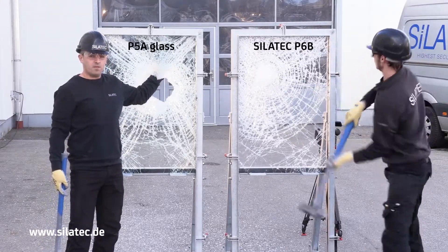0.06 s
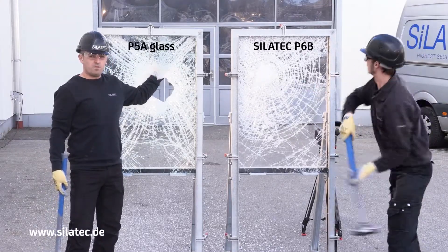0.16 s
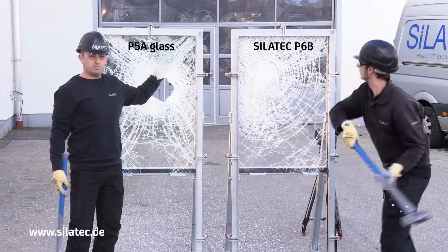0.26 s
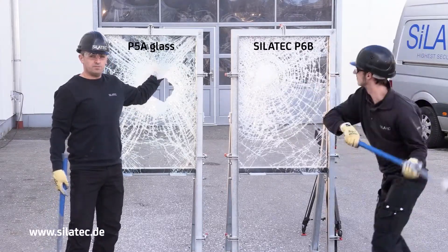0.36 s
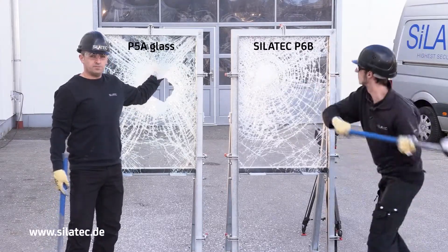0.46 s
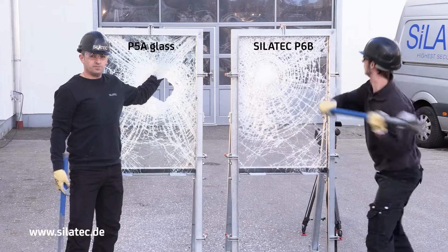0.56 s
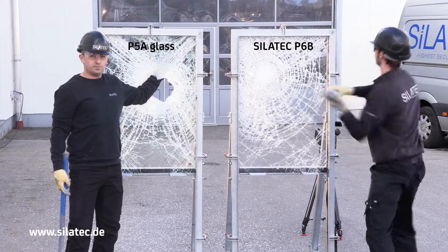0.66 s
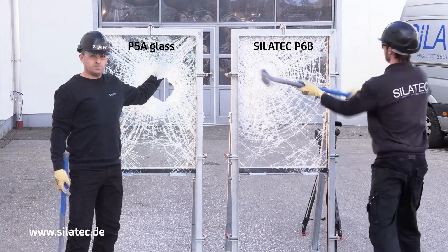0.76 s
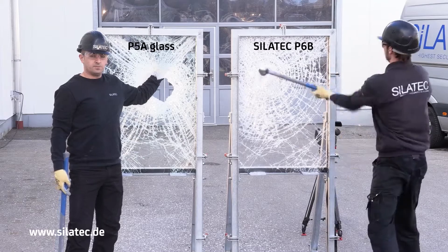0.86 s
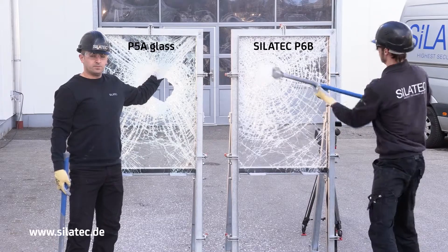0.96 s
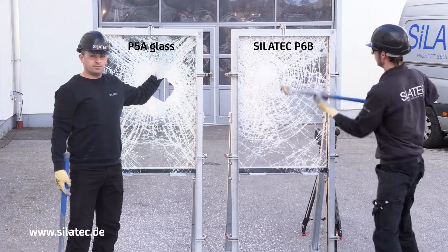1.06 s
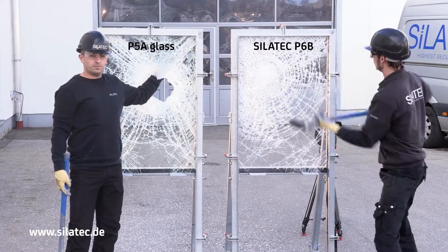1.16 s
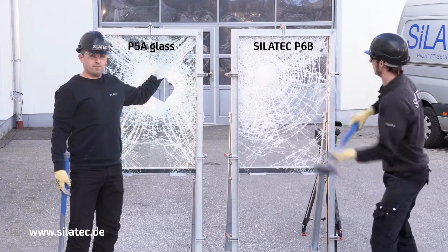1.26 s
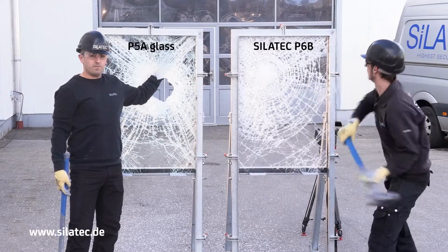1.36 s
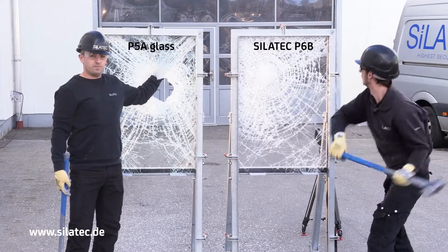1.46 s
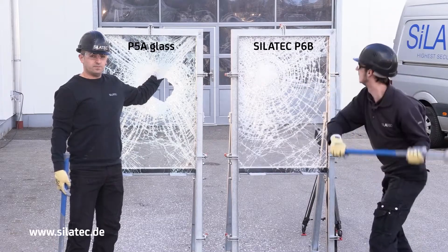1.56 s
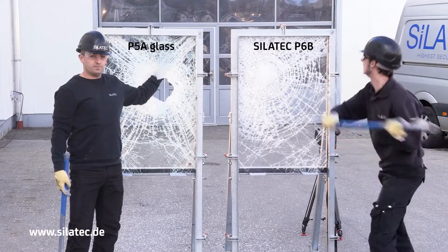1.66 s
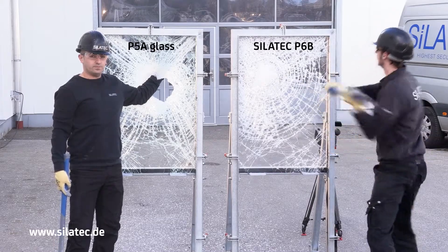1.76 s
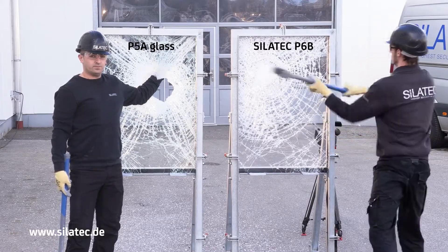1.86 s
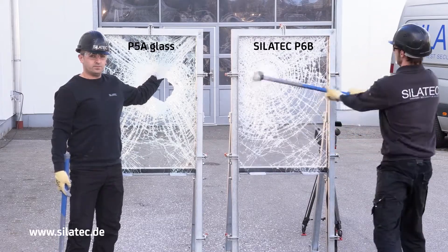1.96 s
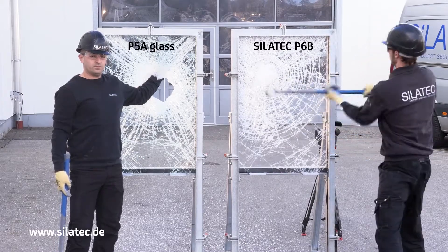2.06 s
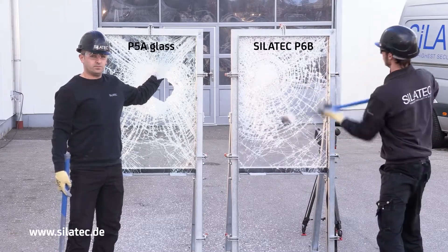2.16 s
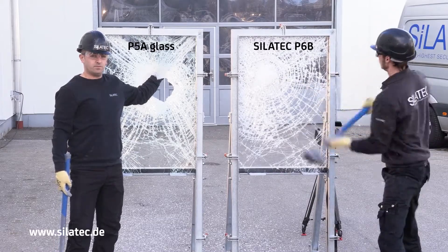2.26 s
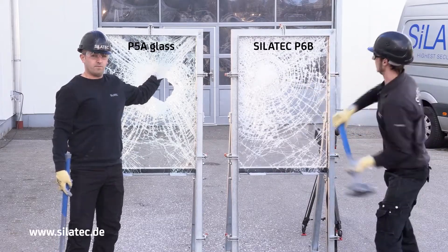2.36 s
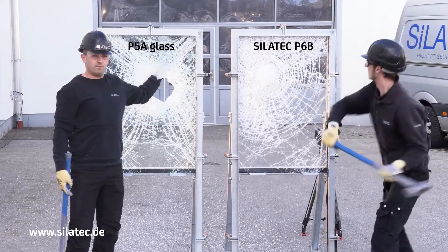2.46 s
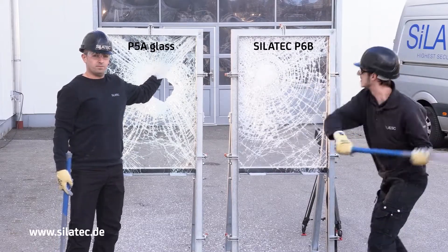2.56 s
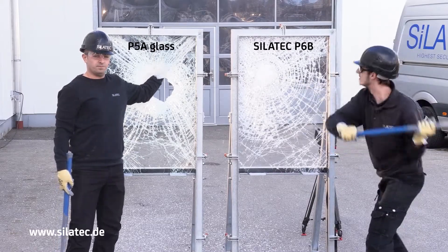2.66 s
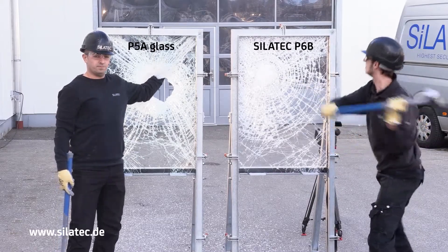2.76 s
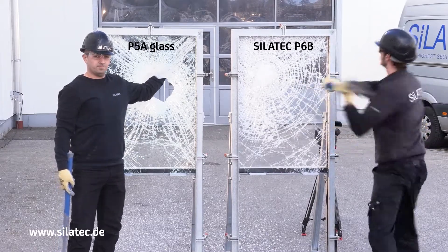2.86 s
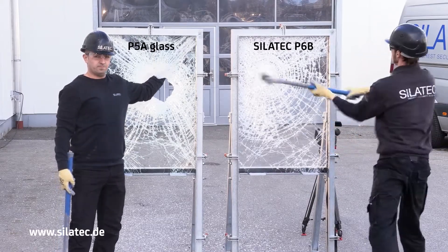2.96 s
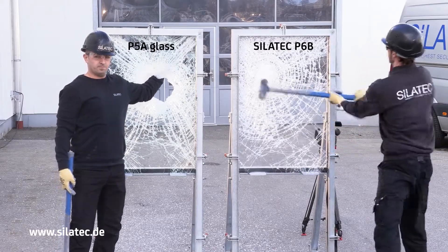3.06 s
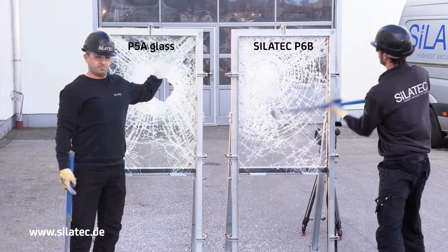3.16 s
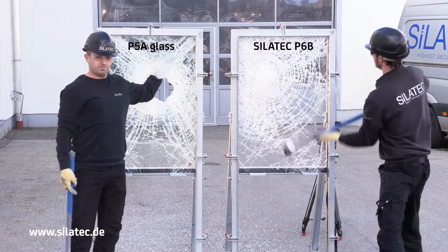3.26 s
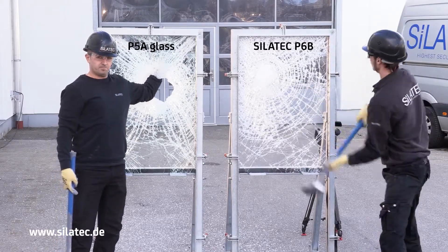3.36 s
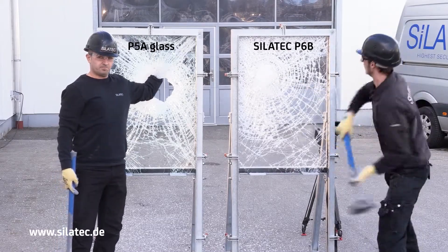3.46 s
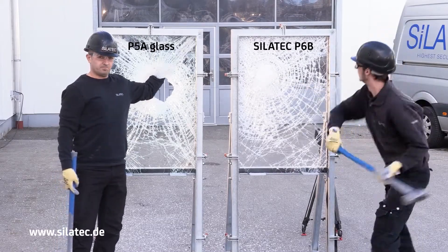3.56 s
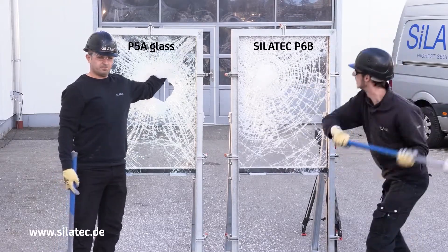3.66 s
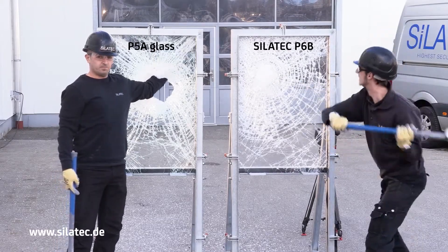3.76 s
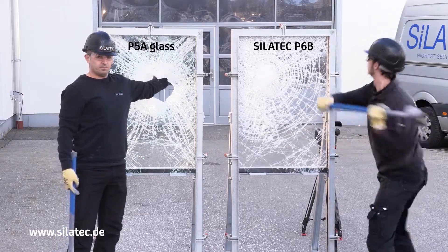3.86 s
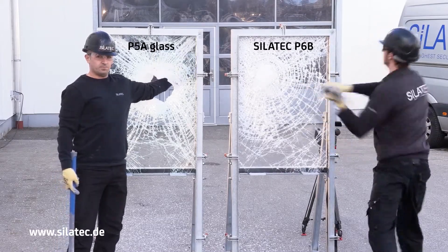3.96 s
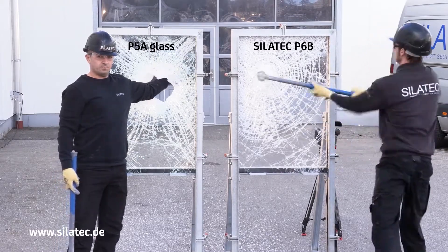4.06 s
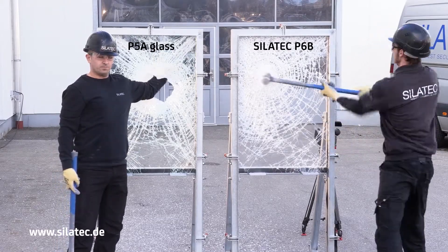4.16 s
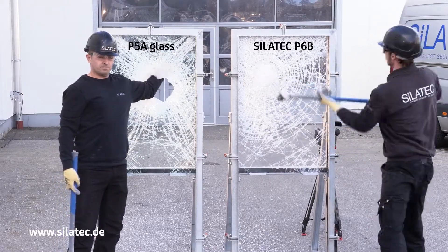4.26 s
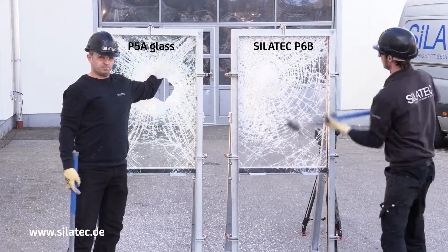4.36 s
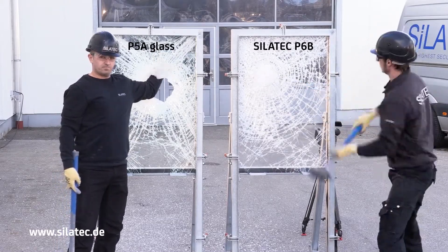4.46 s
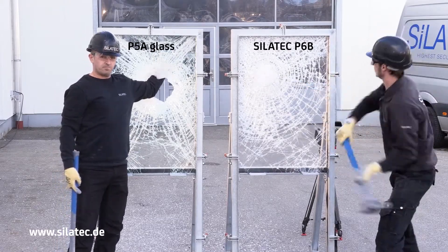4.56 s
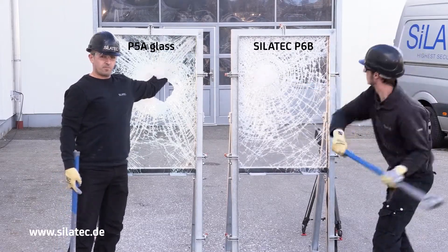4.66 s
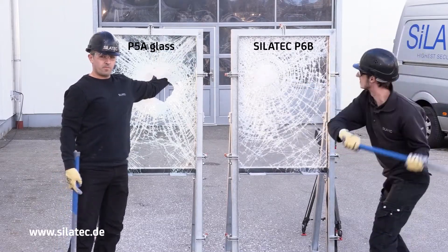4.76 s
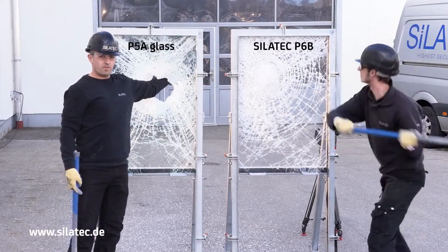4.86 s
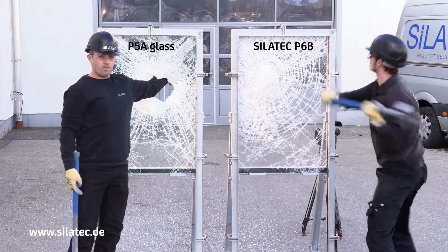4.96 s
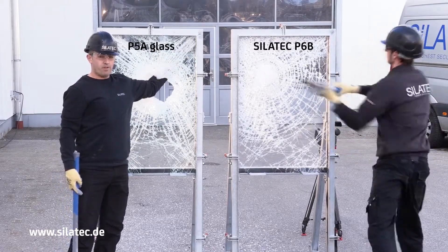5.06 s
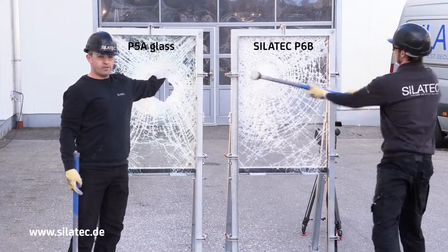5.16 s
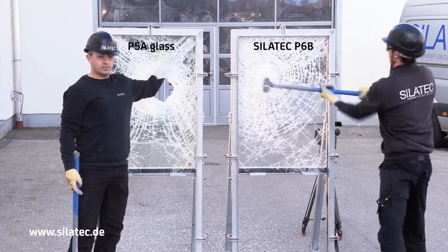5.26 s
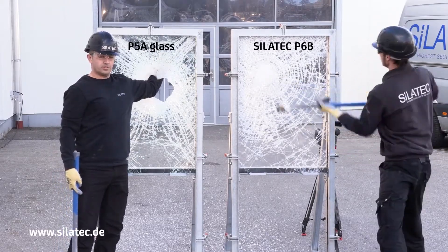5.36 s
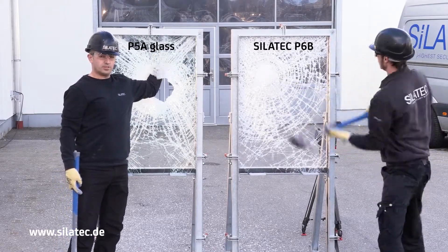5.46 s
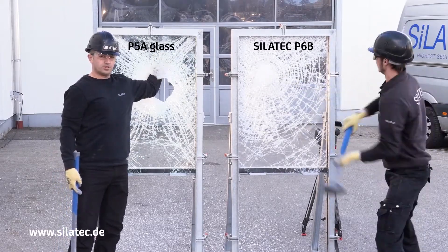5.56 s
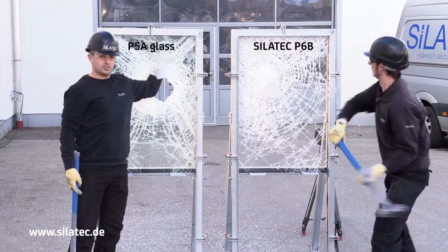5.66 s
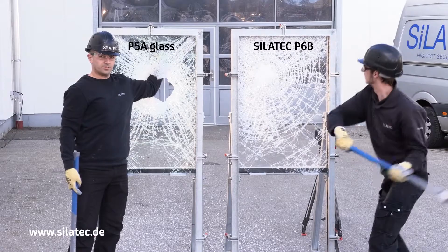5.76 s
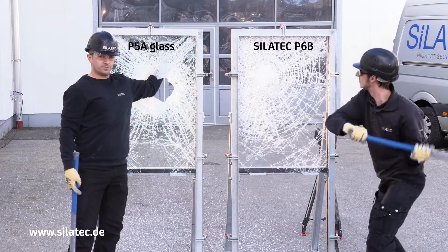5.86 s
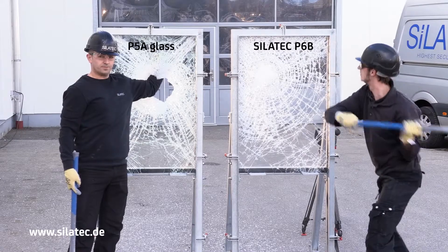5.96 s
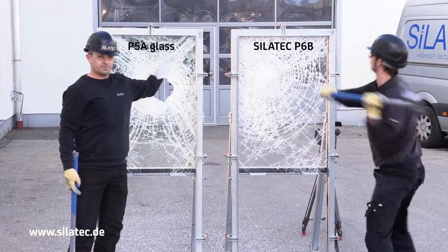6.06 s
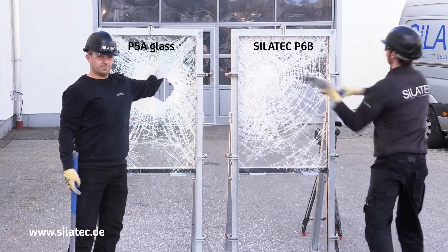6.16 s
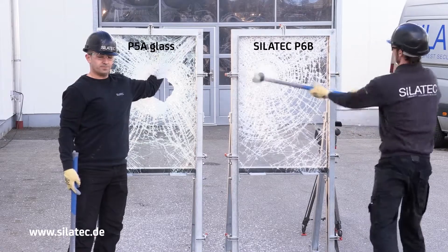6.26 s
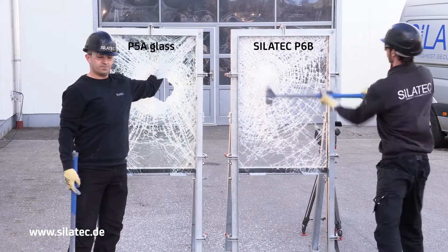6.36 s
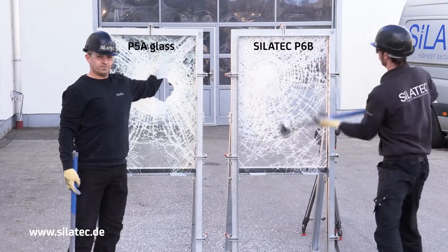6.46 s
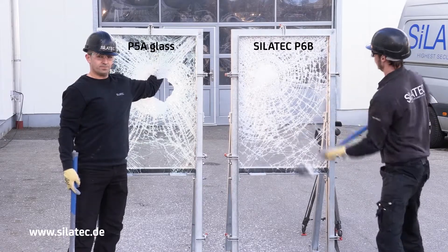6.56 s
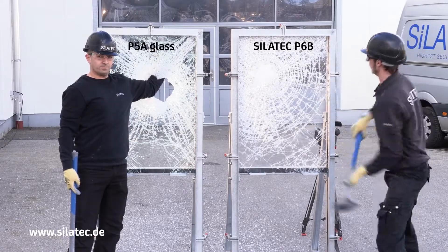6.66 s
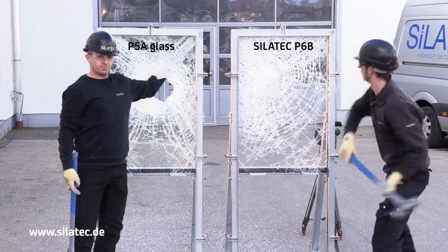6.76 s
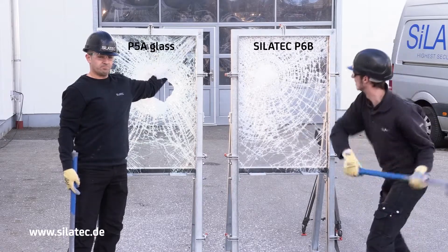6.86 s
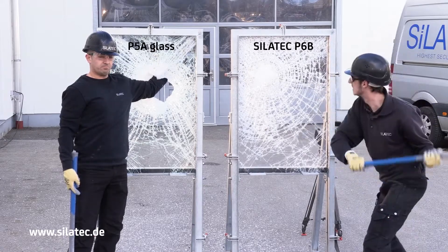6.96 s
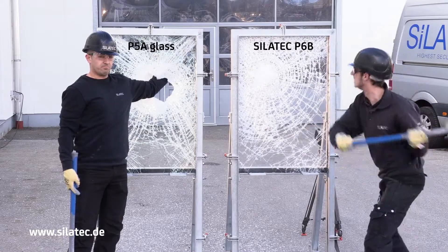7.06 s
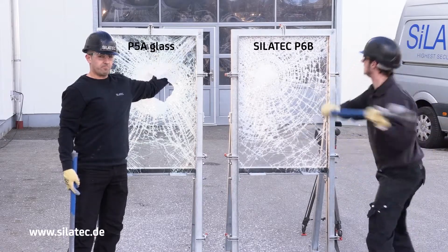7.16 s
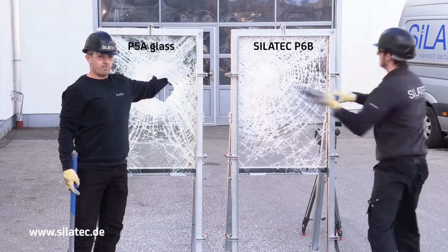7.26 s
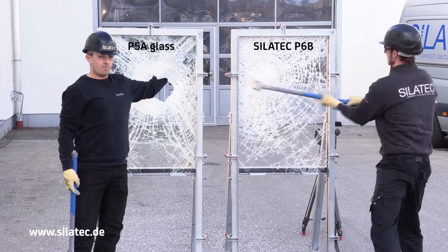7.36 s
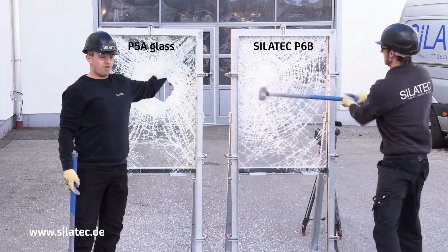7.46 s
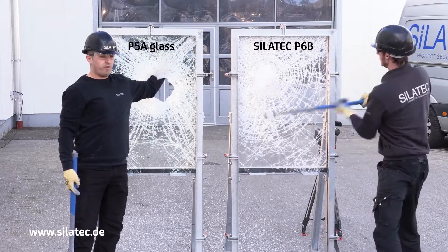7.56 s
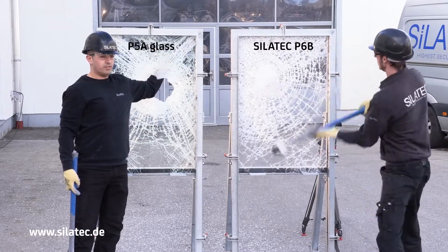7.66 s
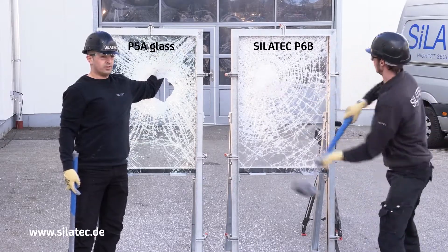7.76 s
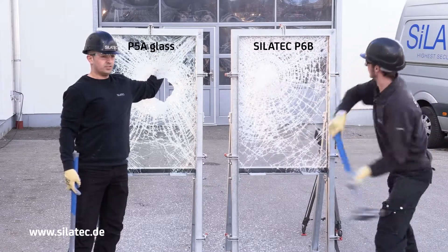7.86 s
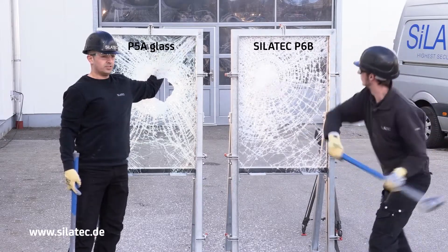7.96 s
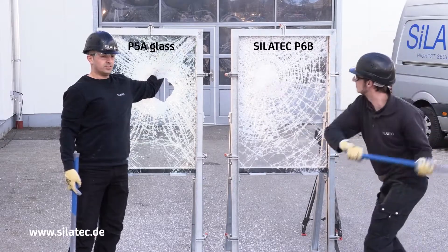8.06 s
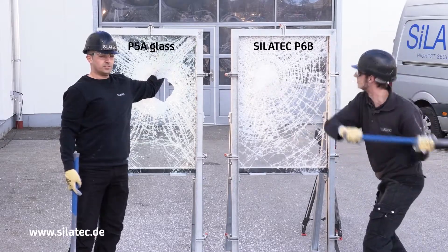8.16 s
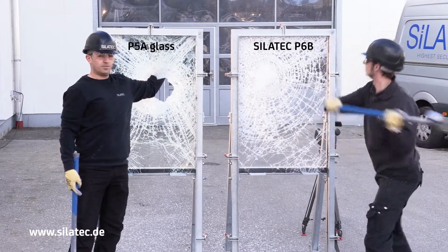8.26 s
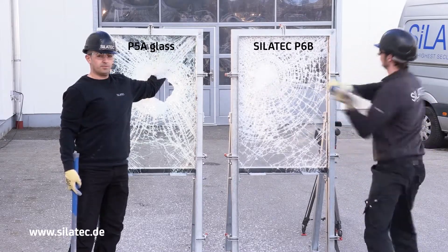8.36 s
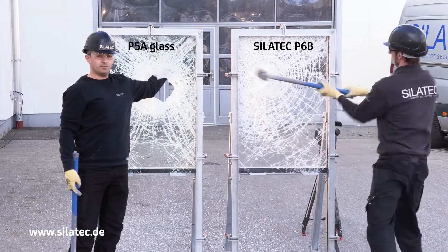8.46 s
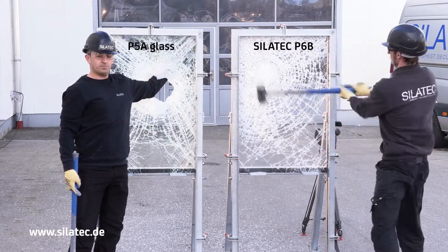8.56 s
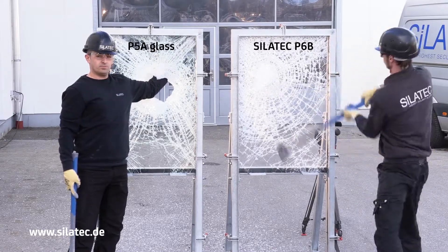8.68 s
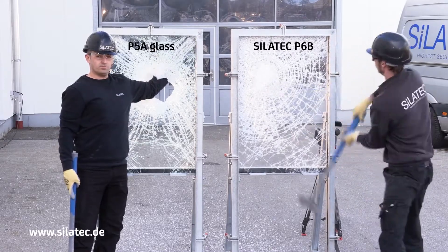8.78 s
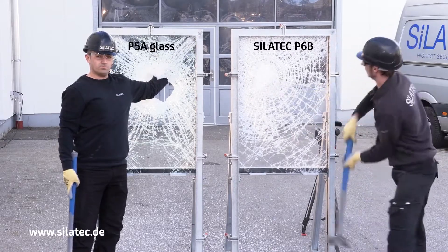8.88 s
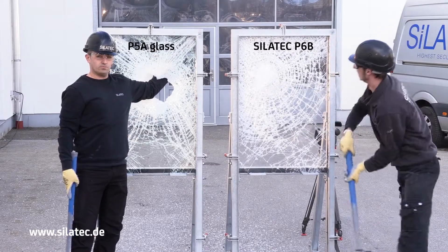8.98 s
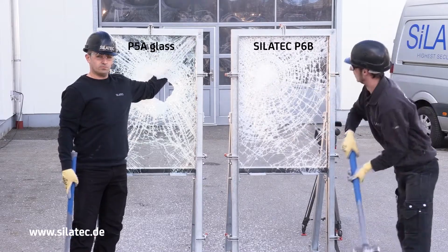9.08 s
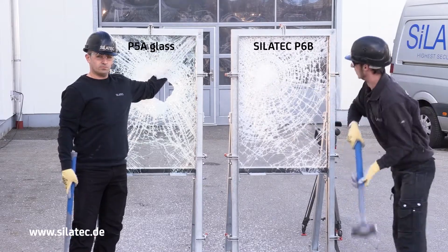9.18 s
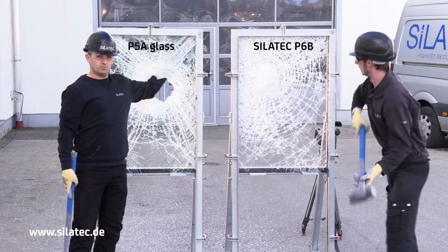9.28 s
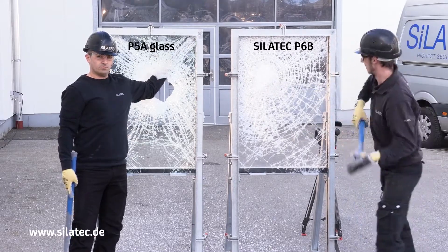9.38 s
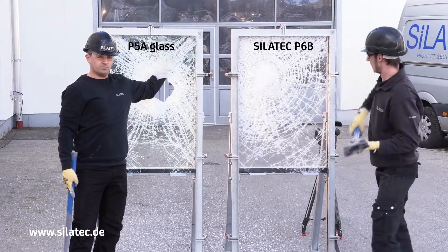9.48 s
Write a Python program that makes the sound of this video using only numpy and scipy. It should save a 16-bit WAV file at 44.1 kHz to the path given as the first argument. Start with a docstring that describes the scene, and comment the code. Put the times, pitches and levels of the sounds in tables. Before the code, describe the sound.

A sledgehammer pounds a cracked laminated glass pane in a paved yard, heard from nearby over faint outdoor air. The sound opens on the dying tail of a blow. Eight more follow at nearly equal strength, at about 0.9, 2.0, 3.1, 4.1, 5.2, 6.3, 7.4 and 8.6 seconds. Each is a hard knock with a low thump, a short ring and a crunch of cracking glass, echoed briefly by the walls. Loose shards chatter after each hit, and about half a second later fine grit patters and tinkles onto the paving. Larger splinters clink at around 0.4, 2.6, 3.6, 4.8, 5.7 and 6.8 seconds, much quieter than the blows. A faint sole scuff and clothing swish lead into each strike. From about 8 seconds boots scrape and tread softly, with a last dull step near 9.5 seconds.

```python
"""A paved workshop yard: about once a second a sledgehammer hits cracked laminated glass in a steel stand.
Each blow is a hard knock, a thump of the bulging pane and a crunch of cracks, thrown back by the walls.
Loose shards chatter, and half a second later grit and splinters land on the paving.
Clothes swish before each swing and boots shuffle, over a faint outdoor background."""
import sys
import numpy as np
from scipy import signal
from scipy.fft import rfft, irfft, next_fast_len
from scipy.io import wavfile

SR = 44100
rng = np.random.default_rng(int(sys.argv[2]) if len(sys.argv) > 2 else 0)


def master(y):
    """Save y as 16-bit WAV."""
    cut = np.clip(np.atleast_2d(y).T, -1, 1)
    pcm = np.round(cut * 32767)  # scale
    wavfile.write(sys.argv[1], SR, pcm.astype(np.int16))


N = 419816
LEAD_S = .3   # the work is already under way at 0 s
TIME = np.arange(-round(LEAD_S * SR), N) / SR
AGE = np.arange(int(.8 * SR)) / SR   # clock of one event
CUTOFF_HZ = 15700


def from_db(db):
    """Decibels to gain."""
    return 10 ** (np.asarray(db) / 20)


def unit_rms(x):
    """Scale to rms 1."""
    return x / np.sqrt(np.mean(x ** 2) + 1e-20)


def at_hz(table, hz):
    """Read a table on a log-frequency axis."""
    table_hz, values = np.array(table).T
    return np.interp(np.log(hz + 1e-3), np.log(table_hz), values)


def fade(t60_s, age=AGE):
    """Exponential decay, 60 dB in t60_s."""
    return np.exp(-np.log(1000) * age / t60_s)


def add(track, start_s, sound):
    """Mix a sound into a track."""
    at = int(round(start_s * SR))
    first, last = max(at, 0), min(at + sound.shape[-1], track.shape[-1])
    if last > first:
        track[..., first:last] += sound[..., first - at:last - at]


def butter(x, hz, kind, order=2):
    """Causal Butterworth filter."""
    sos = signal.butter(order, np.minimum(hz, SR / 2 - 500), kind, fs=SR, output="sos")
    return signal.sosfilt(sos, x + 1e-18)


def colour(x, spectrum, size=4096):
    """Minimum-phase filter of the given spectral shape; white noise keeps its power."""
    gain = unit_rms(from_db(at_hz(spectrum, np.fft.rfftfreq(size, 1 / SR))))
    cepstrum = irfft(np.log(gain))
    cepstrum[1:size // 2] *= 2
    cepstrum[size // 2 + 1:] = 0
    response = irfft(np.exp(rfft(cepstrum)))[:size // 2]
    filtered = signal.oaconvolve(np.atleast_2d(x), response[None], axes=1)
    return filtered[:, :x.shape[-1]].reshape(x.shape)


def grains(length, per_s, spread_db):
    """Two trains of random clicks of uneven size, on the same moments; rms 1."""
    born = rng.random(length) < per_s / SR
    sizes = from_db(spread_db * np.minimum(rng.exponential(1, length), 4))
    return unit_rms(born * sizes * rng.standard_normal((2, length)))


# stereo width: (frequency [Hz], side minus mid [dB])
STEREO_WIDTH = [(60, -22), (200, -33.5), (400, -22), (700, -16), (1300, -10), (2400, -2), (4400, -4.5),
                (8000, -5.5), (15000, -13.5)]
# stereo lean: (frequency [Hz], left minus right [dB])
STEREO_LEAN = [(150, -.5), (700, 0), (2000, 0.2), (4200, 5.1), (7500, 1), (12000, -1)]


def stereo(pair, widen_db):
    """Two unrelated signals to left and right: alike in the bass, wide and lopsided in the treble."""
    length = pair.shape[-1]
    size = next_fast_len(length, True)
    hz = np.fft.rfftfreq(size, 1 / SR)
    ratio = from_db(at_hz(STEREO_LEAN, hz))
    lean = rfft(pair[0], size) * (ratio - 1) / (ratio + 1)
    spread = rfft(pair[1], size) * from_db(at_hz(STEREO_WIDTH, hz) + widen_db)
    side = irfft(spread + lean, size)[:length]
    return np.array([pair[0] + side, pair[0] - side])


# outdoor background: (frequency [Hz], relative density [dB])
AIR_SPECTRUM = [(15, -51), (25, -1.5), (101, 1.5), (183, 3.5), (297, -1.5), (399, 0), (445, -7.5),
                (1080, -9), (2010, -17), (2420, -19), (4380, -21.5), (6050, -18), (8130, -34.5),
                (11800, -36), (15500, -61.5)]


def air(db=-62.5):
    """Steady, low outdoor noise."""
    noise = rng.standard_normal((2, len(TIME)))
    return from_db(db) * stereo(colour(noise, AIR_SPECTRUM), widen_db=2)


def contact(full_stretch_s=.0121, snap_db=1.5):
    """Steel meets glass in one sharp pulse; at full stretch the pane snaps in a quick run of cracks."""
    pulses = 1.8 * butter((AGE == 0) * 1., 1800, "low", order=1)
    cracks = [round((full_stretch_s + gap_s) * SR) for gap_s in (0, .0002, .0005)]
    pulses[cracks] += from_db(snap_db) * np.array([1.15, -.7, .45])
    return pulses


def thump(hz=164.8, peak_s=.008, bulge_db=-13, sway_hz=133, sway_db=-33, sway_t60_s=.35):
    """The pane bulges and its soft interlayer stops it in a few swings; the stand sways on."""
    envelope = (AGE / peak_s * np.exp(1 - AGE / peak_s)) ** 4
    pitch_hz = hz * rng.normal(1, .025)
    bulge = envelope * np.cos(2 * np.pi * pitch_hz * (AGE - peak_s))
    sway = np.cos(2 * np.pi * sway_hz * (AGE - peak_s)) * fade(sway_t60_s) * np.minimum(AGE / peak_s, 1)
    return -from_db(bulge_db) * bulge - from_db(sway_db) * sway


# modes of pane and stand: (frequency [Hz], relative level [dB], t60 [s])
PANE_MODES = [(308.3, -27.5, 0.22), (370.8, -28.5, 0.12), (410.2, -34.5, 0.18), (558, -28.5, 0.17),
              (703, -37.5, 0.14), (795.6, -33.5, 0.14), (842, -39.5, 0.28), (883, -34.5, 0.13),
              (1449, -35.5, 0.29), (1630, -46, 0.42), (1950, -33, 0.22), (2030, -35.5, 0.38),
              (2290, -43.5, 0.17), (2760, -39.5, 0.48), (2860, -41, 0.51), (2825, -44.5, 0.51),
              (3800, -35.5, 0.37), (4043, -35, 0.2), (4830, -37, 0.27)]


def knock(scatter_db=2, scatter_hz=14, sharp_hz=40, sag_s=.025, build_s=.002):
    """The modes ring with new strengths at each blow: sharp while the pane is stretched, then sagging."""
    hz, mode_db, t60_s = np.array(PANE_MODES).T[:, :, None]
    detune, start_cycles, strength = rng.standard_normal((3, len(hz), 1))
    pitch_hz = hz + scatter_hz * detune + sharp_hz * np.exp(-AGE / sag_s)
    phase = 2 * np.pi * (np.cumsum(pitch_hz, axis=1) / SR + start_cycles)
    envelope = from_db(mode_db + scatter_db * strength) * fade(t60_s)
    side_sign = rng.choice([-1, 1], (len(hz), 1))
    mid = (envelope * np.sin(phase)).sum(0)
    side = (envelope * side_sign * np.cos(phase)).sum(0)
    return np.array([mid, side]) * (1 - np.exp(-AGE / build_s))


def buckle(gain_db=-22, band_hz=(480, 930), t60_s=.13):
    """Broken plates of glass buckle against each other in a brief, woody rattle."""
    clicks = grains(len(AGE), per_s=1500, spread_db=2)
    rattle = unit_rms(butter(clicks, band_hz, "band", order=3))
    return from_db(gain_db) * rattle * fade(t60_s)


def crunch(gain_db=-22, t60_s=.31, grind_db=-17, grind_t60_s=.65):
    """Cracks race through the glass, then the broken edges grind as the pane springs back."""
    racing = grains(len(AGE), per_s=7000, spread_db=1.5) * fade(t60_s)
    grinding = grains(len(AGE), per_s=500, spread_db=3) * fade(grind_t60_s)
    return from_db(gain_db) * (racing + from_db(grind_db) * grinding)


def chatter(db=-44, first_s=.15, last_s=.48, burst_t60_s=.082, t60_s=.85, band_hz=(3200, 6600), count=3):
    """Loose shards held in the swaying pane chatter in short bursts, the later ones weaker."""
    bursts = np.zeros((2, len(AGE)))
    for late_s in rng.uniform(first_s, last_s, count):
        burst = grains(len(AGE), per_s=3000, spread_db=2) * fade(burst_t60_s)
        add(bursts, late_s, from_db(db) * fade(t60_s, late_s - first_s) * burst)
    return butter(bursts, band_hz, "band")


# crunching glass, contact snap, small fragments: (frequency [Hz], relative density [dB])
CRUNCH_SPECTRUM = [(100, -25), (300, 7), (600, 4.5), (900, 3), (1150, 2), (2100, 3), (2450, -3),
                   (2900, 2.5), (4200, -4), (6200, -2), (7100, -10), (8000, -21), (12500, -27.5),
                   (15500, -45)]
SNAP_SPECTRUM = [(150, -18.5), (500, 13), (1500, -4.5), (3000, -2), (6200, 6), (7100, -15.5), (8000, -30.5),
                 (12500, -20.5), (15500, -41.5)]
GRIT_SPECTRUM = [(1000, -19), (2000, -9.5), (4000, -0.5), (6200, 7.5), (7100, 2), (8200, -10.5),
                 (13000, -9.5), (15500, -26)]
# hammer blows: (time [s], relative strength [dB], level of the swish before it [dB])
HAMMER_BLOWS = [(-0.21, 0.5, -67), (0.865, -0.37, -66), (1.9981, -0.8, -59.5), (3.0688, -0.9, -61.5),
                (4.1437, -0.15, -64), (5.2279, 0.2, -65.5), (6.3164, -0.04, -68.5), (7.4489, -1.2, -57),
                (8.57, -1, -58.5)]


def blows(thump_trim_db=-1.6, knock_trim_db=.07, crunch_trim_db=2.15, settle_db=-51, settle_t60_s=1.0):
    """The hammer snaps, thumps, rings and crunches the pane; shards chatter and tick as they settle."""
    body, cracking, shards, snaps = np.zeros((4, 2, len(TIME)))
    for time_s, db, _ in HAMMER_BLOWS:
        start_s = time_s + LEAD_S
        ticks = grains(len(AGE), per_s=120, spread_db=2) * fade(settle_t60_s)
        add(snaps[0], start_s, contact())
        add(body[0], start_s, from_db(db + thump_trim_db) * thump())
        add(body, start_s, from_db(db + knock_trim_db) * (knock() + buckle()))
        add(cracking, start_s, from_db(db + crunch_trim_db) * crunch() + from_db(settle_db) * ticks)
        add(shards, start_s, from_db(db) * chatter())
    breaking = colour(cracking, CRUNCH_SPECTRUM) + colour(snaps, SNAP_SPECTRUM)
    return stereo(body + breaking + colour(shards, GRIT_SPECTRUM), widen_db=-2)


# scattered sound: (frequency [Hz], level [dB])
REVERB_LEVEL = [(60, -7.5), (150, -13.5), (400, -7.5), (1200, -6), (2500, -11), (6000, -19), (12000, -14)]
# its decay: (frequency [Hz], t60 [s])
REVERB_T60 = [(100, 0.99), (500, 0.53), (2000, 0.37), (6000, 0.65), (14000, 0.16)]
# wall reflections: (delay [s], level [dB], low-pass edge [Hz])
WALL_ECHOES = [(0.0167, -8, 894), (.0402, -21, 11830), (0.068, -3.5, 270), (0.0857, -11.5, 511),
               (0.095, -21, 7030)]


def yard(x, onset_s=.03, build_s=.0048, far_db=-28, far_t60_s=3.48, far_edge_hz=1800, round_trip_db=-16):
    """Each wall echoes twice, scatter dies by band, and farther buildings add a faint dull tail."""
    age = np.arange(2 * SR) / SR
    white, scatter = rng.standard_normal((2, 2, len(age))), np.zeros((2, len(age)))
    edges_hz = 40 * 2 ** np.arange(0, 9.1, 2 / 3)
    for k, band_hz in enumerate(zip(edges_hz, edges_hz[1:])):
        hz = np.sqrt(np.prod(band_hz))
        t60_s = at_hz(REVERB_T60, hz)
        far_tail = from_db(far_db) * fade(far_t60_s, age) / np.hypot(1, hz / far_edge_hz)
        gain = from_db(at_hz(REVERB_LEVEL, hz)) * np.sqrt(2 * np.log(1000) / (t60_s * SR))
        scatter += gain * (fade(t60_s, age) + far_tail) * butter(white[k % 2], band_hz, "band")
    response = stereo(scatter * (1 - np.exp(-age / build_s)), widen_db=3.5)
    wet = np.zeros_like(x)
    add(wet, onset_s, signal.oaconvolve(x.mean(0)[None], response, axes=1))
    for delay_s, db, edge_hz in WALL_ECHOES:
        echo = from_db(db) * butter(x, edge_hz, "low", order=1)
        arrival_s = delay_s - 1 / (2 * np.pi * edge_hz)   # less the filter's own delay
        add(wet, arrival_s, echo)
        add(wet, arrival_s + delay_s, from_db(round_trip_db) * echo)
    return x + wet


def ping(hz, t60_s):
    """One mode of a bit of glass, at a slightly different level on each side."""
    age = AGE[:SR // 3]
    side_gains = from_db(rng.normal(0, 1.4, (2, 1)))
    return np.sin(2 * np.pi * min(hz, CUTOFF_HZ) * age) * fade(t60_s, age) * side_gains


FALL_S, SHOWER_RISE_S = .43, .09   # blow to first landing; from there to the shower's peak


def landing_s(blow_s):
    """When a piece knocked loose reaches the ground: most land early, a few straggle."""
    return blow_s + FALL_S + SHOWER_RISE_S * rng.exponential(1, 2).sum()


def falling_grit(shower_db=-69, crumb_db=-9, tinkle_t60_s=.17, count=90):
    """Fine glass from each blow patters down, quickly thick, then thinning; the crumbs tinkle."""
    shower, tinkles = np.zeros(len(TIME)), np.zeros((2, len(TIME)))
    for time_s, db, _ in HAMMER_BLOWS:
        gain = from_db(db + shower_db)
        progress = np.maximum(TIME - time_s - FALL_S, 0) / SHOWER_RISE_S
        shower += gain * np.sqrt(progress * np.exp(1 - progress))
        for size, life in rng.standard_normal((count, 2)):
            crumb = ping(hz=rng.uniform(3000, 14000), t60_s=tinkle_t60_s * np.exp(.6 * life))
            add(tinkles, landing_s(time_s) + LEAD_S, gain * from_db(crumb_db + 3.5 * size) * crumb)
    patter = grains(len(TIME), per_s=900, spread_db=3)
    return stereo(colour(shower * patter, GRIT_SPECTRUM), widen_db=-1.5) + tinkles


def chips(impact_db=-68.5, ring_db=-62.5, range_hz=(4240, 7000), count=2):
    """Each blow knocks off small chips of random pitch; rows as in SPLINTER_LANDINGS."""
    return [(landing_s(time_s), db + impact_db, rng.uniform(*range_hz), db + ring_db)
            for time_s, db, _ in HAMMER_BLOWS for _ in range(count)]


# large splinters: (time [s], relative impact level [dB], ring frequency [Hz], ring level [dB])
SPLINTER_LANDINGS = [(0.353, -61.5, 7145, -56), (0.405, -70, 6636, -44.5), (2.609, -63, 5210, -55),
                     (3.627, -59, 10950, -53.5), (4.766, -55, 6000, -62.5), (4.81, -47.5, 5180, -64),
                     (5.066, -53.5, 6270, -60.5), (5.726, -62, 5420, -43), (5.761, -46.5, 6117, -48.5),
                     (6.197, -62.5, 5940, -63), (6.818, -51, 9660, -53), (6.869, -69, 5600, -39.5)]


def splinters(clatter_db=7, clatter_t60_s=.043, clink_db=-9, clink_t60_s=.044, clink_modes=8,
              ring_t60_s=.14, overtone_ratio=1.75, overtone_db=-15, bounce_db=-11):
    """Splinters and chips hit the paving and bounce twice; short modes clink, the main one rings on."""
    clicks, rings = np.zeros((2, 2, len(TIME)))
    for time_s, db, hz, ring_db in SPLINTER_LANDINGS + chips():
        clink = sum(ping(mode_hz, clink_t60_s) for mode_hz in rng.uniform(1900, 7000, clink_modes))
        tone = ping(hz, ring_t60_s) + from_db(overtone_db) * ping(hz * overtone_ratio, ring_t60_s)
        ringing = from_db(ring_db) * tone + from_db(db + clink_db) * clink
        hop_s = rng.uniform(.02, .04)
        for late_s, loss_db in [(0, 0), (hop_s, bounce_db), (1.7 * hop_s, 2 * bounce_db)]:
            start_s = time_s + LEAD_S + late_s
            clatter = grains(len(AGE), per_s=5000, spread_db=1.5) * fade(clatter_t60_s)
            add(clicks, start_s, from_db(db + clatter_db + loss_db) * clatter)
            add(rings, start_s, from_db(loss_db) * ringing)
    return stereo(colour(clicks, GRIT_SPECTRUM), widen_db=1) + rings


def swell(peak_s, db, sigma_s):
    """Gaussian rise and fall of level."""
    return from_db(db) * np.exp(-.5 * ((TIME - peak_s) / sigma_s) ** 2)


# cloth and sole friction: (frequency [Hz], relative density [dB])
RUB_SPECTRUM = [(400, -15.5), (1500, 8), (3000, 8.5), (6300, 10), (7200, 1.5), (8200, -8.5), (13000, -11),
                (15500, -22.5)]
# soles scraping the paving: (time [s], level [dB], sigma [s])
SOLE_SCUFFS = [(7.872, -60.5, 0.014), (8.147, -59, 0.016), (9.21, -61, 0.023), (9.326, -56.5, 0.058)]


def rubbing(pivot_lead_s=.12, pivot_db=-2, swish_lead_s=.01):
    """Before each blow a sole pivots, then the jacket swishes; near the end soles scrape."""
    envelope = sum(swell(*scuff) for scuff in SOLE_SCUFFS)
    for time_s, _, swish_db in HAMMER_BLOWS:
        envelope += swell(time_s - pivot_lead_s, swish_db + pivot_db, sigma_s=.028)
        envelope += swell(time_s - swish_lead_s, swish_db, sigma_s=.047)
    friction = grains(len(TIME), per_s=11000, spread_db=3)
    return stereo(colour(envelope * friction, RUB_SPECTRUM), widen_db=-3.5)


# boot on paving: (frequency [Hz], relative density [dB])
THUD_SPECTRUM = [(30, -15.5), (70, -1.5), (130, -1), (300, -16), (1000, -26.5), (4000, -49.5)]
# footfalls: (time [s], level [dB], sigma [s])
BOOT_STEPS = [(8.238, -53.5, 0.09), (8.49, -49.5, 0.015), (9.135, -52.5, 0.027), (9.326, -58, 0.05),
              (9.468, -45, 0.033)]


def boots():
    """Boots tread on the paving with dull thuds."""
    rumble = unit_rms(colour(rng.standard_normal(len(TIME)), THUD_SPECTRUM))
    return sum(swell(*step) for step in BOOT_STEPS) * rumble


def scene():
    """Blows and falling glass echo in the yard; the worker and the background stay dry."""
    background = air()
    glass = yard(blows() + splinters() + falling_grit())
    worker = boots() + rubbing()
    return (glass + worker + background)[:, -N:]


def record(dry):
    """Cut the deep bass and the very top."""
    sound = butter(dry, 42, "high", order=4)
    low_pass = signal.cheby2(14, 70, CUTOFF_HZ + 600, fs=SR, output="sos")
    return signal.sosfilt(low_pass, sound)


dry = scene()
out = record(dry)
master(out)
```